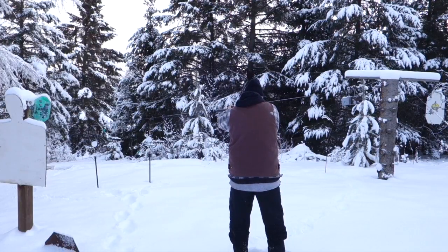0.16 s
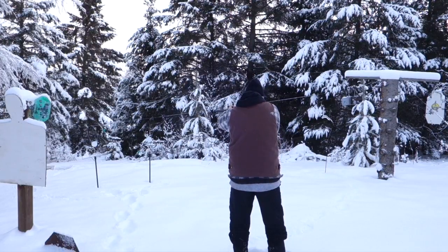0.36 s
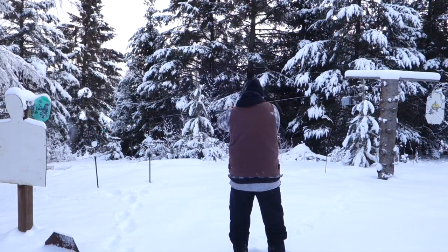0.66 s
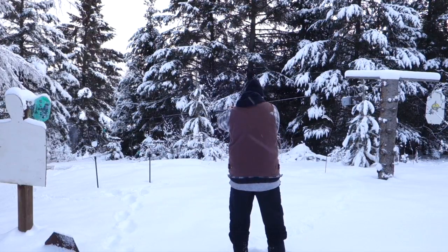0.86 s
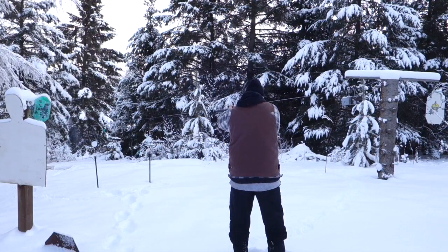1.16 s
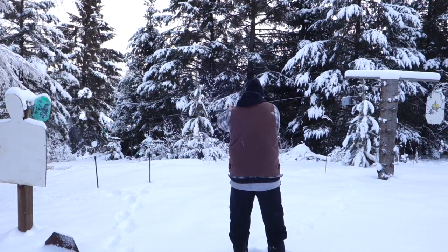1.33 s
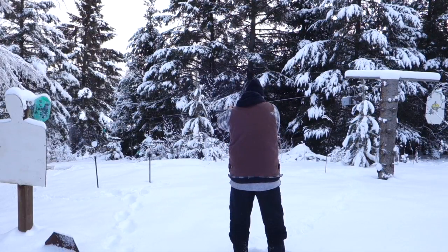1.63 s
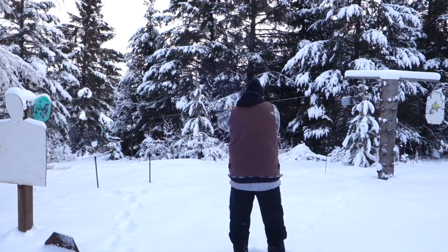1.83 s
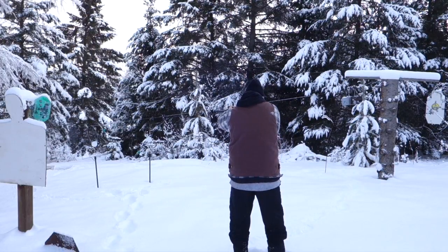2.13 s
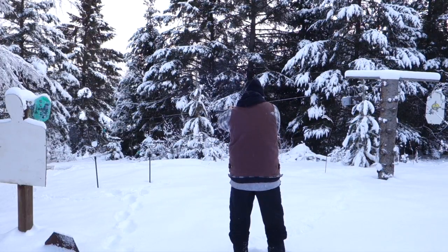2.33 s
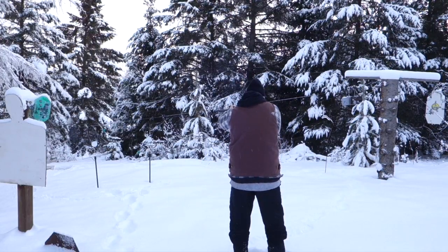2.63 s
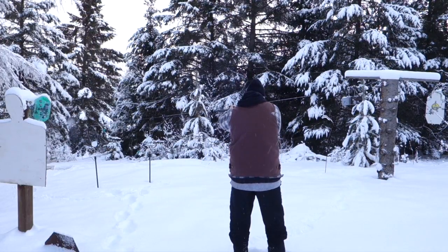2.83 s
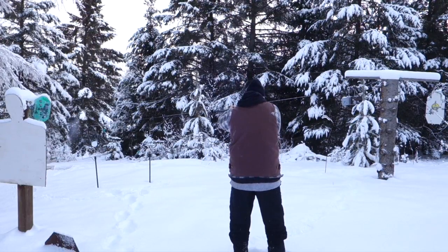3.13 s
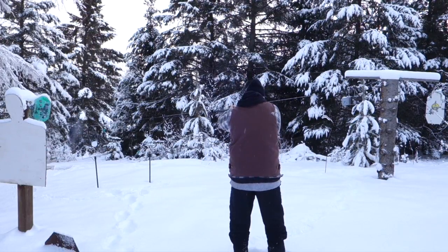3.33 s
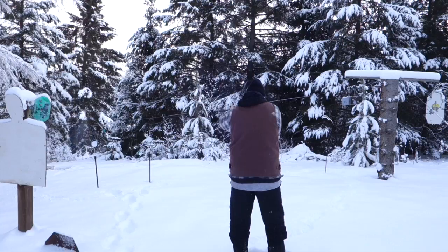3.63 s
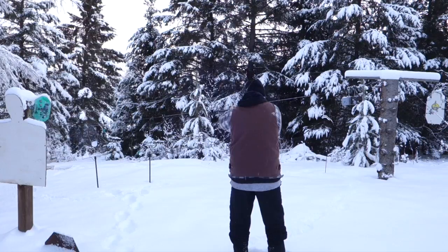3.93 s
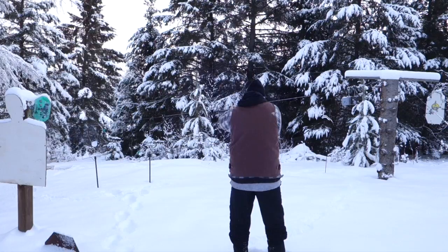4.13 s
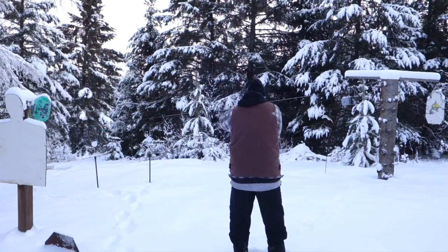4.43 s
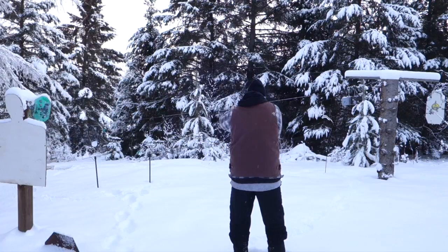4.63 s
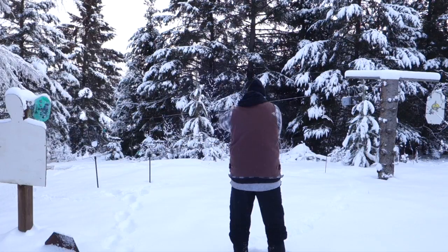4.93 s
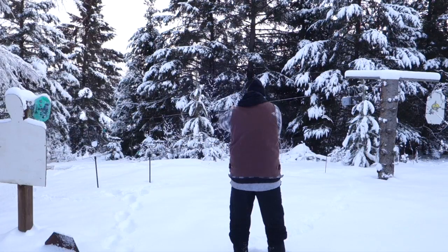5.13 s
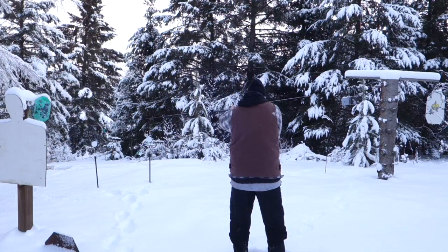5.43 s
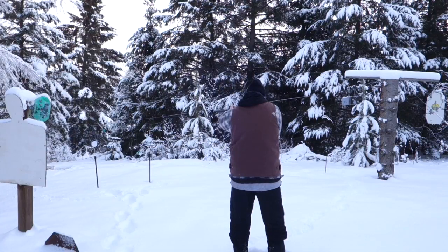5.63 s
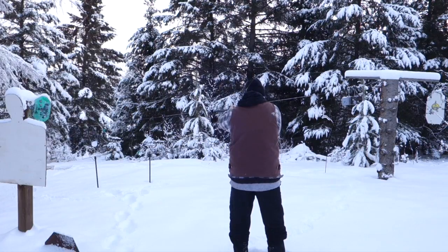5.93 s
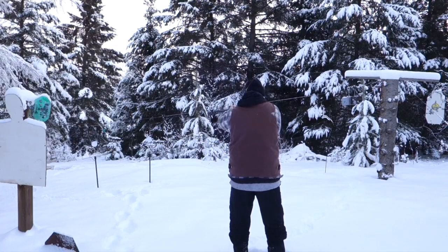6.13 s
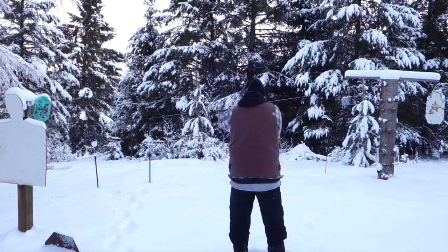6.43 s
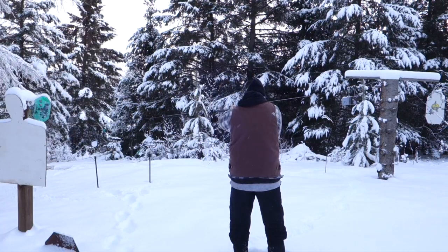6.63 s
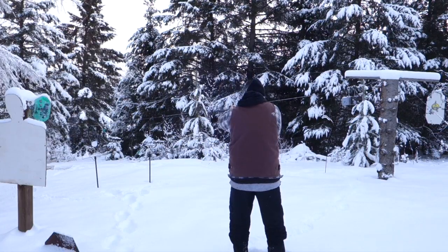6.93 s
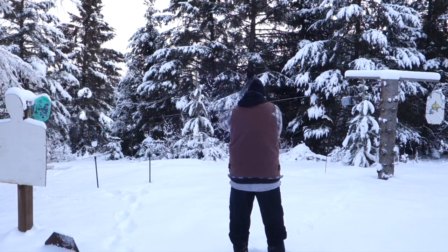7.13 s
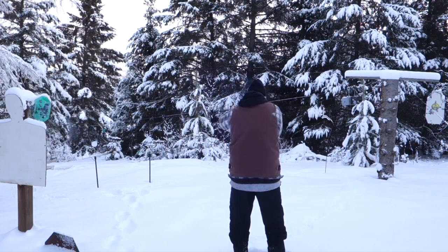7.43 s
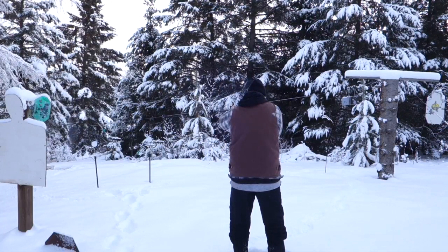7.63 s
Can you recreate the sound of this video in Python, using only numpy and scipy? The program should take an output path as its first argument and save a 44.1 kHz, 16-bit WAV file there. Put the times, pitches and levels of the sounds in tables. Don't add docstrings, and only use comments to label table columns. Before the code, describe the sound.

From a few paces behind the shooter in a snowy clearing ringed by firs, eight suppressed rifle shots. Each is a short hollow pop and gas puff, then three quick metal clacks of the bolt. The first two send loud crackling echoes rolling off the trees; six slower rounds follow with short echoes, knocks down range and one fading ricochet whine. Quiet winter air and far traffic lie beneath.

```python
import sys
import numpy as np
from scipy import signal
from scipy.io import wavfile
from scipy.ndimage import uniform_filter1d

SR = 44100
rng = np.random.default_rng(int(sys.argv[2]) if len(sys.argv) > 2 else 0)


def master(y):
    cut = np.clip(np.atleast_2d(y).T, -1, 1)
    pcm = np.round(cut * 32767)
    wavfile.write(sys.argv[1], SR, pcm.astype(np.int16))


def invert_db(x):
    u = np.asarray(x, float) / 20
    return 10 ** u


N = 342657
FAST_COUNT = 2


def evened(x):
    return x / np.sqrt(np.mean(x ** 2) + 1e-20)


def peaked(x):
    return x / abs(x).max()


def panned(x, pan_db):
    return x * invert_db([[pan_db / 2], [-pan_db / 2]])


def read(points, hz):
    f, value = np.transpose(points)
    return np.interp(np.log(hz + 1), np.log(f + 1), value)


def add(mix, s, sound):
    part = mix[..., round(s * SR):][..., :sound.shape[-1]]
    part += sound[..., :part.shape[-1]]


def band(x, lo_hz, hi_hz, order=2):
    return signal.sosfilt(signal.butter(order, [lo_hz, hi_hz], "band", fs=SR, output="sos"), x)


def resonate(x, hz, width):
    turn = np.exp(2j * np.pi * np.cumsum(hz * np.ones(len(x))) / SR)
    r = np.exp(-np.pi * width / SR)
    smooth = signal.lfilter([1 - r], [1, -r], x / turn + 1e-18)
    return 2 * (turn * smooth).real


# frequency in Hz, side over mid in dB.
SIDE_OVER_MID = [(60, -26), (140, -25), (350, -19.5), (840, -9), (2020, -7.5), (4870, 0.7), (11700, 1.5)]


def spread(mid, side, gain_db, size):
    hz, t, z = signal.stft(np.array([mid, side]), SR, nperseg=size, noverlap=size * 3 // 4)
    z = z * invert_db(gain_db(hz[:, None], t))
    z[1] *= invert_db(read(SIDE_OVER_MID, hz))[:, None]
    m, s = signal.istft(z, SR, nperseg=size, noverlap=size * 3 // 4)[1][:, :len(mid)]
    return np.array([m + s, m - s])


# frequency in Hz, density in dB per Hz.
AIR_COLOUR = [(65, -58.5), (110, -29.5), (221, -9.5), (388, -5.5), (617, 1), (858, -2), (1020, -1),
              (1940, -14.5), (2440, -18), (3820, -33.5), (10700, -37.5), (11300, -41.5), (14700, -72),
              (22000, -120)]
# frequency in Hz, width in Hz, level in dB.
MACHINE_HUMS = [(157, 3.9, -77), (484.3, 5, -60)]


def air():
    wash = spread(*rng.standard_normal((2, N)), lambda hz, t: read(AIR_COLOUR, hz) + 0 * t, size=2048)
    hums = sum(invert_db(db) * evened(resonate(rng.standard_normal(N), hz, width)) for hz, width, db in MACHINE_HUMS)
    return invert_db(-52.2) * evened(wash) + hums


def trees(size, per_s, uneven_db):
    hit = rng.random((2, size)) < per_s / SR
    sign = rng.choice([-1., 1.], hit.shape)
    taps = hit * sign * invert_db(uneven_db * np.minimum(rng.exponential(1, hit.shape), 3.5))
    return taps / taps.std()


# frequency in Hz, density in dB per Hz.
NEAR_COLOUR = [(88, -62.5), (150, -33.5), (298, -12.5), (495, -1), (698, -2.5), (1040, -3.5), (1120, -4),
               (1270, 1.5), (1660, -4), (2340, -2), (3620, -6), (10500, -14.5), (11300, -14.5),
               (14700, -49.5), (22000, -120)]
NEAR_TREBLE_DB, NEAR_BASS_DB = -2.5, -12
# frequency in Hz, share of the treble change.
TREBLE_SHARE = [(1600, 0.0074), (2600, 0.32), (3600, 0.56), (5000, 0.91), (8000, 1.245), (11000, 1.28)]
# frequency in Hz, share of the bass change.
BASS_SHARE = [(120, 1.1), (300, 1.2), (480, 0.71), (900, 0.0046)]


def echoes(rows, lumps_db=1.3, hold=.022):
    s, level_db, treble_db, bass_db = np.transpose(rows)
    t = np.arange(s[0], s[-1] + hold, 1 / SR)
    taps = trees(len(t), per_s=11000, uneven_db=2.6)
    middle_hz = np.linspace(600, 2800, 50)
    base_db = -10 * np.log10(np.mean(invert_db(read(NEAR_COLOUR, middle_hz)) ** 2) * 2200 / (SR / 2))

    def colour_db(hz, at):
        dull = read(TREBLE_SHARE, hz) * (np.interp(at + s[0], s, treble_db) - NEAR_TREBLE_DB)
        full = read(BASS_SHARE, hz) * (np.interp(at + s[0], s, bass_db) - NEAR_BASS_DB)
        return base_db + read(NEAR_COLOUR, hz) + dull + full

    smooth = uniform_filter1d(uniform_filter1d(rng.standard_normal(len(t)), 180), 180)
    lumps = evened(smooth)
    edges = np.clip(np.minimum((t - s[0]) / 0.0022, (t[-1] - t) / .006), 0, 1)
    level = invert_db(np.interp(t, s, level_db) + lumps_db * lumps)
    return s[0], spread(*taps, colour_db, size=256) * level * edges


def distance_rows(start, after, level_db, treble, bass):
    bright_db, loss_db, bright_s, dull_s = treble
    first_db, thin_db, thin_s, return_db = bass
    treble_db = bright_db - loss_db * (1 - np.exp(-np.maximum(after - bright_s, 0) / dull_s))
    bass_db = np.interp(after, [0, thin_s], [first_db, thin_db]) + return_db * np.maximum(after - thin_s, 0)
    return np.transpose([start + after, level_db, treble_db, bass_db])


# seconds after the shot, level in dB.
FAST_ANSWER = [(.007, -33.5), (.09, -21), (.16, -16), (.28, -21.5), (.57, -40.5), (.7, -43), (.83, -40),
               (1.0, -44), (1.5, -56)]
# seconds after the shot, level in dB.
SLOW_ANSWER = [(.007, -28.5), (0.014, -34.5), (0.04, -27), (.07, -30), (.095, -28.5), (0.126, -34.5),
               (.3, -47), (.5, -62.5), (.85, -68.5)]


def woods(start, strength_db, fast):
    if fast:
        curve, treble, bass = FAST_ANSWER, (2.6, 75, .02, 0.92), (-5.5, -26.5, 0.08, 10.5)
    else:
        curve, treble, bass = SLOW_ANSWER, (1, 28, .12, .42), (-4.5, -17, 0.06, 25.5)
    s, level_db = np.transpose(curve)
    after = np.arange(s[0], s[-1], .005)
    return echoes(distance_rows(start, after, strength_db + np.interp(after, s, level_db), treble, bass))


def crack_echoes(rows, sharpness=1.1):
    s, level_db, hz = np.transpose(rows)
    t = np.arange(s[0], s[-1], 1 / SR)
    centre = np.interp(t, s, hz)
    taps = trees(len(t), per_s=900, uneven_db=3.5)
    colour_db = lambda f, at: -sharpness * 14 * np.log2((f + 30) / np.interp(at + s[0], s, hz)) ** 2
    sound = spread(*taps, colour_db, size=256) / np.sqrt(centre)
    return s[0], evened(sound) * invert_db(np.interp(t, s, level_db)) * signal.windows.tukey(len(t), .04)


# seconds after the shot, level in dB, centre in Hz.
CRACK_RETURNS = [(.016, -30.5, 2900), (0.053, -24.5, 2750), (.094, -19, 2350), (.154, -19, 1950),
                 (.225, -21, 1480), (.3, -24.5, 1150), (.405, -38, 1057), (.57, -55, 1000)]


def sonic_return(start, strength_db):
    return crack_echoes(np.array(CRACK_RETURNS) + [start, strength_db, 0])


# middle in seconds, length in seconds, level in dB, centre in Hz.
HILLSIDE_RETURNS = [(1.86, .45, -49, 1900), (2.8, .2, -37, 1700), (3.259, 0.29, -58, 1970),
                    (4.149, .45, -58, 2300), (5.12, 0.28, -62, 1600)]


def hillside(mix):
    for middle, length, level_db, hz in HILLSIDE_RETURNS:
        first = (middle - length / 2, level_db - 7.5, hz)
        last = (middle + length / 2, level_db - 7, hz)
        add(mix, *crack_echoes([first, (middle, level_db, hz), last], sharpness=2.2))


def slap(peak_db, hz, pan_db=0.8, t60_ms=21):
    t = np.arange(round(.06 * SR)) / SR
    u = (t - .0015) * hz * 6.4
    swing = band(-u * np.exp(-u ** 2 / 2), hz / 2.5, hz * 2.4)
    fall = invert_db(-60 * t / (np.clip(t60_ms, 4, 90) / 1000)) * np.minimum(t / 0.0024, 1)
    smear = band(rng.standard_normal(len(t)) * fall, hz / 2, hz * 1.5, order=3)
    return panned(invert_db(peak_db) * peaked(peaked(swing) + 0.55 * peaked(smear)), pan_db)


# seconds after the shot, peak in dB, pitch in Hz.
BANKS = [(.209, -13, 1316), (.244, -9.5, 1160), (.295, -9, 920), (.316, -14, 1020), (.661, -26, 1240),
         (.686, -26, 905), (.718, -26, 810), (0.7532, -19, 700), (.777, -28, 900), (.814, -27, 1000),
         (.933, -22, 1000), (.99, -27, 942), (1.011, -32, 562), (1.289, -29, 714), (1.44, -33, 627)]


def bank_slaps(mix, start, strength_db):
    for after, db, hz in BANKS:
        add(mix, start + after, slap(db + strength_db, hz))


# start in seconds, peak in dB, pitch in Hz.
FURTHER_SLAPS = [(0.8315, -33, 1900), (0.899, -23, 900), (0.952, -32, 955), (1.648, -25.5, 1900),
                 (1.832, -22, 950), (1.852, -20, 1680), (3.571, -25, 560), (3.589, -23, 520),
                 (4.508, -25, 700), (4.543, -22, 600), (4.622, -24.5, 1400), (5.535, -28, 1400),
                 (6.492, -28, 1300), (7.18, -22.5, 1000), (7.314, -24.5, 1300), (7.32, -24, 900)]


def further_slaps(mix):
    for s, db, hz in FURTHER_SLAPS:
        add(mix, s, slap(db, hz))


# start in seconds, level in dB, fade in dB per second, treble over level in dB.
STRIKE_ROWS = [(1.651, -52, 170, -3), (1.855, -54, 170, -5), (2.676, -24.5, 98.5, -6),
               (3.525, -35, 70, 0.5), (3.588, -33.5, 67.5, -4), (4.505, -31, 78, -3),
               (4.618, -36.5, 111, -9.5), (5.458, -33.5, 76, -3.5), (6.351, -46, 70, -8),
               (6.49, -45, 78, -10.5), (7.154, -33.5, 76, -4), (7.312, -37.5, 115.5, -17)]


def strike_echoes(mix):
    rise_s, length_s, ease = .008, .62, .5
    after = np.arange(0, length_s, .004)
    for start, level_db, fade_db, treble_db in STRIKE_ROWS:
        rise_db = -12 * np.maximum(1 - after / rise_s, 0)
        fall_db = fade_db * after * (1 - ease * after / length_s) + 12 * (after / length_s) ** 6
        treble, bass = (-0.5, 25, 0.09, .27), (-13.5, -21, -0.1, 38)
        rows = distance_rows(start, after, level_db + rise_db - fall_db, treble, bass)
        add(mix, *echoes(rows + [0, 0, treble_db, 0]))


# start in seconds, length in seconds, first pitch in Hz, rise in Hz per second, level in dB.
TUMBLERS = [
    (3.585, .72, 850, 190, -43),
    (4.545, .1, 705, 600, -46),
]
# half-rate tone in dB, fade in dB per second.
TUMBLER_VOICES = [
    (-3, 22),
    (-14, 40),
]


def whine(start, length, hz, rise, level_db, half_db, fade_db, wobble=.004, bend=.25):
    t = np.arange(0, length, 1 / SR)
    drift = evened(uniform_filter1d(rng.standard_normal(len(t)), 600))
    puffs = np.cumsum((hz + rise * t * (1 - bend * t)) * (1 + wobble * drift)) / SR
    half = invert_db(half_db - 14 * t + 4 * np.cos(2 * np.pi * 1.8 * t)) * np.sin(np.pi * puffs)
    tone = np.sqrt(2) * (np.sin(2 * np.pi * puffs) + half)
    return start, tone * invert_db(level_db - fade_db * t) * signal.windows.tukey(len(t), .08)


# frequency in Hz, width in Hz, level in dB.
STEEL_MODES = [(1270, 100, -0.5), (2340, 70, -4), (2873, 100, 3), (3750, 130, -10.5), (4900, 150, -17)]


def knock(peak_db, bass_db, pan_db, t60_ms, ring_hz, ring_db=-7, steel_db=-5):
    t = np.arange(round(.06 * SR)) / SR
    fall = invert_db(-60 * t / (np.clip(t60_ms, 4, 90) / 1000)) * np.minimum(t / 0.00032, 1)
    rattle, thud = rng.standard_normal((2, len(t))) * fall
    steel = sum(invert_db(db) * resonate(rattle, hz, width) for hz, width, db in STEEL_MODES)
    ring = resonate(resonate(rattle, ring_hz, 550), ring_hz, 550)
    bright = peaked(band(rattle, 1400, 11000)) + invert_db(steel_db) * peaked(steel) + invert_db(ring_db) * peaked(ring)
    dull = invert_db(bass_db + 5) * peaked(band(thud, 320, 1200, order=3))
    return panned(invert_db(peak_db) * (peaked(bright) + dull), pan_db)


# start in seconds, peak in dB, bass over treble in
# dB, ring in Hz.
LOOSE_KNOCKS = [(0.1558, -18.5, -17, 2140), (0.8307, -36.5, -16, 2200), (1.0598, -8, -24, 2680),
                (1.197, -14.5, -20, 1410), (1.6492, -37.5, -19, 2190), (1.8525, -37.5, -5, 2810),
                (2.069, -49, -7.5, 2500), (2.6808, -9.5, -19.5, 1250), (2.6992, -14, -13, 1380),
                (2.711, -12.5, -26, 2070), (2.7794, -32, -17, 2060), (3.4107, -21, -14, 2430),
                (3.5268, -16.5, -21, 2870), (3.5578, -17, -13, 2610), (3.5892, -13.5, -11.5, 3220),
                (4.5071, -18.5, -12.5, 1280), (4.6201, -22, -9.5, 1170), (5.4599, -15, -13, 1270),
                (5.571, -27, -17, 2300), (6.353, -18, -19, 2670), (6.4915, -27.5, -13, 1230),
                (7.0872, -16.5, -17, 4100), (7.155, -14.5, -28, 3260), (7.1792, -14, -14, 3000),
                (7.3139, -28, -14, 2600), (1.17, -9, -22, 1800), (1.1195, -9, -18, 2500),
                (4.3955, -16, -20, 2400)]


def loose_knocks(mix):
    for s, db, bass_db, hz in LOOSE_KNOCKS:
        add(mix, s, knock(db, bass_db, pan_db=1, t60_ms=20.7, ring_hz=hz))


# peak in dB,
# bass over treble in dB, left over right in dB, 60 dB decay in ms, ring in Hz.
SLOW_BLOWS = [
    (-15, -17.5, 2.5, 19, 1200),
    (-10, -18.5, 0.5, 20, 2700),
    (-11.5, -18, -2, 24, 1260),
]
FAST_BLOWS = [
    (-11, -27.5, 8.3, 13, 3100),
    (-8, -24.5, 3, 19, 2500),
    (-6.5, -13.5, 3.3, 28, 2000),
]
# unlock, rear and shut, all in seconds.
BOLT_TIMES = [(0.168, 0.1968, 0.2274), (1.04, 1.0754, 1.1001), (2.5452, 2.5696, 2.6150),
              (3.3974, 3.4194, 3.4567), (4.3394, 4.363, 4.417), (5.294, 5.3207, 5.3589),
              (6.2087, 6.2307, 6.2874), (7.0068, 7.0267, 7.0743)]
BOLT_STRENGTH = [-1, 1.5, -1, -1.4, -0.5, 1.3, -1.3, -1.5]


def bolt(mix):
    for k, (times, strength_db) in enumerate(zip(BOLT_TIMES, BOLT_STRENGTH)):
        blows = FAST_BLOWS if k < FAST_COUNT else SLOW_BLOWS
        for s, (db, *colour) in zip(times, blows):
            add(mix, s, knock(db + strength_db, *colour))


def shot(pop_db, crack_db, tick_db, lead=0.0075):
    t = np.arange(round(0.033 * SR)) / SR
    tick = invert_db(tick_db - 60 * t / .012) * evened(band(rng.standard_normal(len(t)), 1200, 5000))
    u = np.maximum(t - lead, 0)
    ring = np.sin(2 * np.pi * 1150 * u) * np.minimum(u / 0.0016, 1) * np.clip((.0042 - u) / 0.0032, 0, 1)
    v = u - .0031
    crack_noise = evened(band(rng.standard_normal(len(t)), 2400, 12000))
    crack = (v > 0) * invert_db(crack_db - 60 * v / 0.023) * crack_noise * 0.28
    spike = invert_db(crack_db - 2.5) * np.cos(2 * np.pi * 6500 * v) * np.exp(-(v / 0.00012) ** 2)
    w = (u - .0054) / 0.0004
    puff = -1.1 * (1 - w ** 2) * np.exp(-w ** 2 / 2)
    gas_noise = evened(band(rng.standard_normal(len(t)), 1800, 11000))
    hiss = (u > 0) * invert_db(crack_db - 18.5 - 60 * u / .03) * gas_noise
    return hiss + spike + tick * 0.72 + invert_db(pop_db) * (ring + puff) + crack


# start in seconds, pop in dB, crack in dB, hammer tick in dB, echo strength in dB.
RIFLE_SHOTS = [
    (0.1442, -19.5, -12, -47, -0.5),
    (1.018, -17, -9.5, -34.5, -0.33),
    (2.525, -17.5, -8.5, -36, 0.5),
    (3.3706, -18, -8, -34, 0),
    (4.3216, -16.5, -10, -32, 0.3),
    (5.27, -18, -8, -32, 0.05),
    (6.19, -16, -8.5, -36, 0.4),
    (6.9888, -16, -6.5, -30.5, -1),
]


def scene():
    mix = air()
    for k, (s, *levels, echo_db) in enumerate(RIFLE_SHOTS):
        fast = k < FAST_COUNT
        add(mix, s - .0078, shot(*levels))
        add(mix, *woods(s, echo_db, fast))
        if fast:
            add(mix, *sonic_return(s, echo_db))
            bank_slaps(mix, s, echo_db)
    strike_echoes(mix)
    hillside(mix)
    bolt(mix)
    loose_knocks(mix)
    further_slaps(mix)
    for row, voice in zip(TUMBLERS, TUMBLER_VOICES):
        add(mix, *whine(*row, *voice))
    return mix


def top_cut(x):
    return signal.sosfilt(signal.butter(12, 12320, fs=SR, output="sos"), x)


def record(dry):
    cut = signal.sosfilt(signal.butter(3, 150, "high", fs=SR, output="sos"), dry)
    ports = np.array([cut[0], np.roll(cut[1], 1)]) * invert_db([[.45], [-.45]])
    ports = 0.75 * np.tanh(ports / 0.86)
    ports = signal.sosfilt(signal.butter(2, 170, "high", fs=SR, output="sos"), ports)
    level_db = 10 * np.log10(abs(uniform_filter1d((ports ** 2).mean(0), 40)) + 1e-9)
    fall = np.arange(N) * 30.0 / SR
    held = invert_db(np.maximum.accumulate(level_db + fall) - fall)
    steps = np.maximum(np.diff(held, prepend=held[0]), 0)
    jolt = band(np.cumsum(steps), 40, 150) * invert_db(-35)
    rumble = invert_db(-96.5) * evened(band(rng.standard_normal(N), 18, 110))
    edge = signal.firwin(255, 11070, window=("kaiser", 5), fs=SR)
    limited = signal.oaconvolve(ports + jolt + rumble, edge[None], "same")
    return top_cut(limited)


dry = scene()
out = record(dry)
master(out)
```